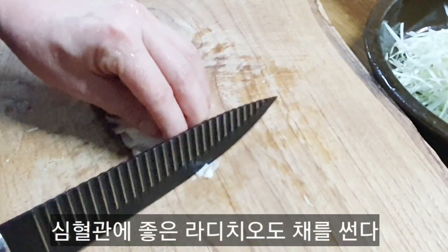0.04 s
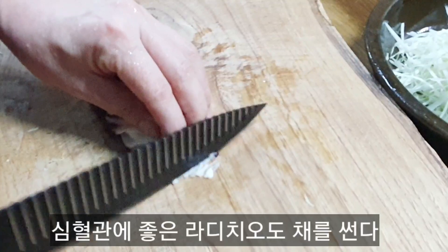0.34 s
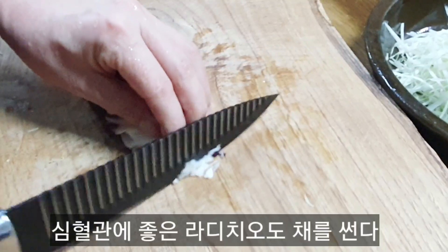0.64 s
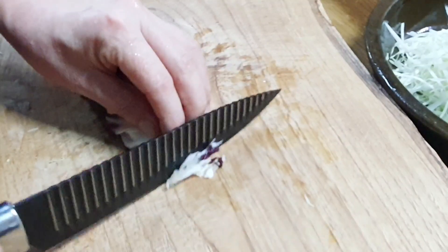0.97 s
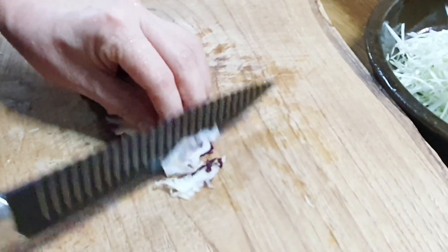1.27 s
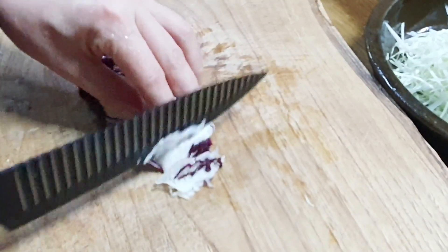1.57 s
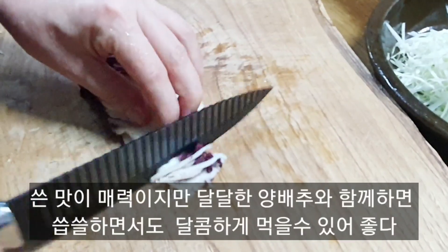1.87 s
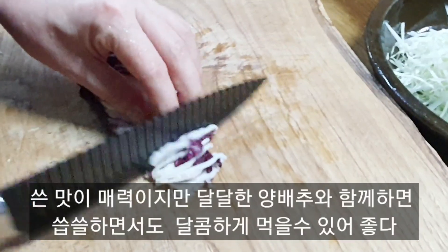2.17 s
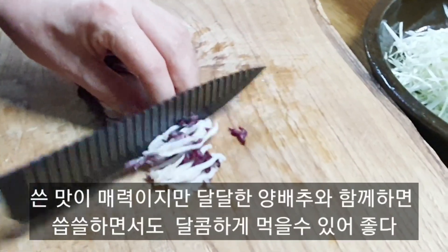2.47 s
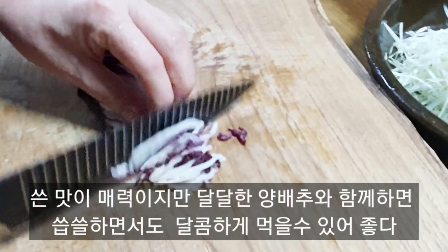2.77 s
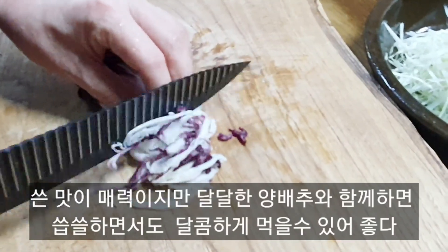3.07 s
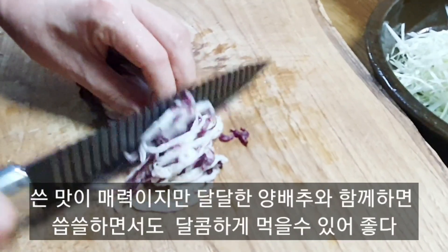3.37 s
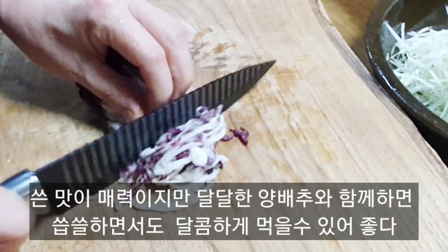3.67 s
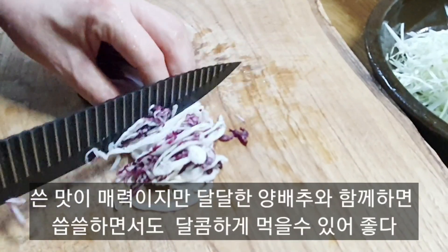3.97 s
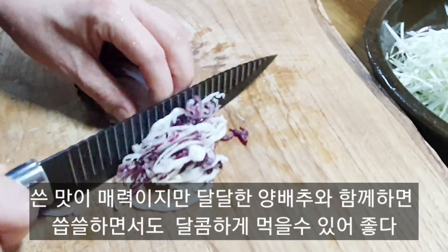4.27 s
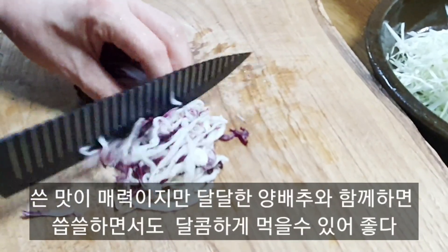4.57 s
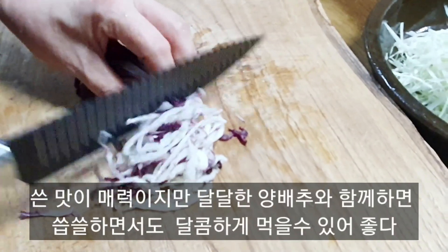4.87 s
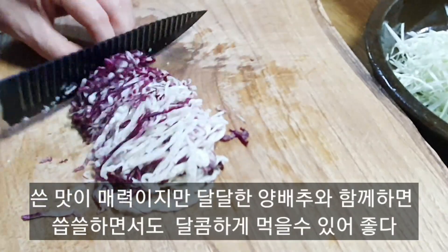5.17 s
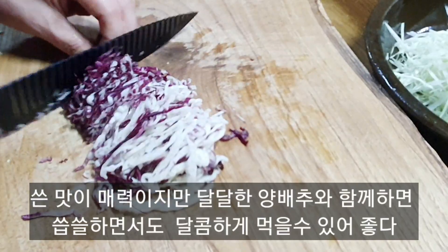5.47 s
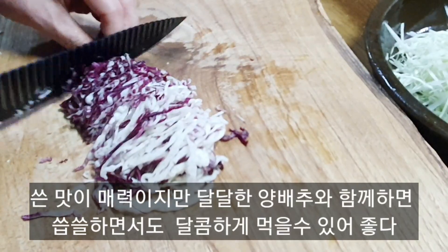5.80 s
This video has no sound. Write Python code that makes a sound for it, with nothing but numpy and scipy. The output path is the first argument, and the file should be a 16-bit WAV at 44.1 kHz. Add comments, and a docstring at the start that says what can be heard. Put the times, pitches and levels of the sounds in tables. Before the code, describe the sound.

A kitchen knife shreds crisp leaves on a thick wooden board, close by and slightly to the left, at five or six strokes a second. Each stroke is a short crunch ending in a woody knock, with the force varying and an occasional leaf snapping. The first five knocks sound lower in pitch, followed by a tiny dropout just before 1 second. The chopping continues, pausing briefly at about 1.6 seconds, then runs evenly and a little crunchier until another short pause near 4 seconds. More firm strokes follow, ending with a sharper leaf snap at about 5.1 seconds. From 5.4 to 6 seconds come four gentle cuts, with two dull bumps of the rocking board among them. A faint, steady rush and hum of a small kitchen lies underneath throughout.

```python
"""A chef's knife shreds a leafy vegetable on a thick wooden board, five or six strokes a second.
Each stroke fractures the leaves in a swelling crunch, then its impact excites the modes of the board.
The first five knocks sound lower in pitch, and a brief dropout follows them; the last four are gentle,
with two dull bumps of the rocking board between them. A small kitchen reverberates and hums faintly."""
import sys
import numpy as np
from scipy import signal
from scipy.fft import rfft, irfft, next_fast_len
from scipy.io import wavfile
from scipy.ndimage import uniform_filter1d

SR = 44100
rng = np.random.default_rng(int(sys.argv[2]) if len(sys.argv) > 2 else 0)


def put_to_file(sound):
    """Save the sound as 16-bit audio at rate SR, in the file named by the first command-line argument."""
    columns = np.atleast_2d(sound).T  # one column per channel
    safe = np.clip(columns, -1, 1)
    whole_steps = np.round(safe * 32767)
    wavfile.write(sys.argv[1], SR, whole_steps.astype(np.int16))


N = 266364

# Knife strokes. Each row: landing time in seconds, relative knock level in dB, chatter against the
# first contact in dB, time in the leaves in seconds, relative crunch level in dB.
STROKES = [(0.0816, -28, -11, 0.0069, -62), (0.275, -38.5, -5, 0.02, -70),
           (0.4586, -31.5, -20, 0.024, -71.5), (0.6532, -32.5, 1, .028, -64),
           (0.8564, -39, -14, 0.046, -64), (1.0238, -48.5, -20, 0.027, -59), (1.1609, -39, -18, 0.033, -60),
           (1.309, -33.5, -8, 0.026, -56.5), (1.4533, -31, -22, .042, -59.5),
           (1.8275, -35.5, -6, 0.041, -59.5), (1.9666, -24.5, -4.5, 0.019, -69),
           (2.1381, -48.5, 5, 0.049, -63), (2.294, -36.5, -7, 0.04, -58.5),
           (2.4484, -43.5, -20, 0.041, -58), (2.602, -38.5, 2.5, .042, -53.5),
           (2.753, -34.5, -13, 0.033, -54), (2.881, -28, 7, .021, -73), (3.0547, -42.5, 9, 0.042, -57.5),
           (3.2307, -39, 1, 0.044, -58.5), (3.4073, -32.5, -17, 0.042, -56),
           (3.5787, -27.5, 13.5, 0.033, -58), (3.7649, -33, -14, .04, -58), (4.1445, -32.5, -8, .044, -61),
           (4.3471, -30.5, -16, 0.048, -58.5), (4.534, -44, -9, 0.046, -58),
           (4.712, -28.5, -3.5, 0.038, -58.5), (4.8948, -31, -16, 0.039, -53.5),
           (5.079, -29.5, -8.5, 0.058, -61), (5.363, -49, 0.5, 0.018, -62), (5.542, -43.5, 1, 0.0058, -56),
           (5.7255, -49.5, -1, 0.011, -62.5), (5.91, -56, -2, 0.018, -68.5)]
# Modes of the struck board. Each row: frequency in Hz, nominal width in Hz, relative level in dB.
BOARD_MODES = [(90, 93, -13.5), (163, 69, -5.5), (314, 20, -19.5), (530, 146, -9), (628, 165, -1),
               (775, 53, 4.5), (851.4, 27, 4), (1262, 169, 2), (1420, 97, 0.5), (1545, 134, -3.5),
               (1753, 120, -11), (2227, 60, -19), (2390, 85, -13), (2660, 180, -20), (2964, 71, -20.5),
               (3280, 41, -23), (4210, 420, -24.5)]
# Cushioning of the blow by the leaves. Each row: frequency in Hz, gain in dB.
CUSHION = [(20, -18), (70, -6), (160, 1), (500, 2.5), (1600, 0.5), (1900, 0.5), (2400, -1.5), (3400, -3.5),
           (5000, -20), (9000, 7), (15000, -45)]
# Radiation of the board into the room. Each row: frequency in Hz, gain in dB.
RADIATION = [(30, -41), (120, -16), (300, -5.5), (480, -4), (720, 4.5), (870, -4), (1030, -2), (1250, 1),
             (1600, -8), (1950, -17.5), (2400, -19), (3300, -34), (5000, -42), (12000, -52.5)]
# Spectrum of the chattering edge. Each row: frequency in Hz, relative level in dB.
CHATTER = [(150, 2.5), (700, 4.5), (1300, 3.5), (1800, 3.5), (2500, 6.5), (4000, 3.5)]
# The knock at the right ear against the left. Each row: frequency in Hz, gain in dB.
KNOCK_RIGHT_DB = [(180, -6.5), (520, -3), (645, -46), (830, 2), (1276, -15.5), (1590, -1), (2380, -7.5),
                  (4000, -11)]
# Phase of the knock at the right ear. Each row: frequency in Hz, lag behind the left in radians.
KNOCK_RIGHT_LAG = [(345, 0), (520, -1.67), (645, 1), (790, 0.84), (880, 1.47), (1276, -1.54), (1590, 0.8),
                   (2210, 1.4), (2670, 0.5)]
# Single leaves snapping. Each row: start in seconds, relative level in dB.
SNAPS = [(0.0816, -60), (0.254, -54.5), (.631, -55), (1.011, -54), (1.68, -58), (2.2375, -58), (2.393, -64),
         (2.7046, -51.5), (5.074, -39), (5.738, -58)]
# The crunch carried by the air. Each row: frequency in Hz, gain in dB.
AIRBORNE = [(40, -20), (200, -14), (700, 2), (1400, 12), (2200, 6.5), (3500, 1.5), (5500, -2), (8000, 1.5),
            (11000, -3), (15000, -13)]
# The crunch carried by the board. Each row: frequency in Hz, gain in dB.
THROUGH_BOARD = [(40, -27), (160, 0), (450, 15.5), (750, 17), (1000, 15), (1400, 14.5), (2000, -10),
                 (2900, 0), (4500, -31), (12000, -14.5)]
# The crunch at the right ear against the left. Each row: frequency in Hz, gain in dB.
CRUNCH_RIGHT_DB = [(700, -38), (2000, -4.5), (4000, -12.5), (8000, -7.5), (13000, -18)]
# Dull bumps of the board. Each row: start in seconds, relative level in dB.
BUMPS = [(5.406, -41.5), (5.778, -39)]
# Modes of the board rocking on the counter. Each row: frequency in Hz, relative level in dB,
# 60 dB decay time in seconds.
ROCKING_MODES = [(159, -3.5, 0.048), (260.3, -11.5, 0.26), (333, -2, 0.05), (447, -0.5, 0.033),
                 (650, -12, 0.048)]
# Kitchen reverberation at pitch ratio 1. Each row: frequency in Hz, 60 dB decay time in seconds.
KITCHEN_T60 = [(150, 0.2), (600, 0.16), (1400, 0.15), (3000, .18), (8000, 0.13), (14000, 0.1)]
# The kitchen's steady rush. Each row: frequency in Hz, relative spectral density in dB.
RUSH_SPECTRUM = [(20, -20), (50, -9.5), (80, -6), (160, -3), (260, -1.5), (380, -3.5), (500, -6),
                 (800, -9.5), (1300, -10), (2000, -18.5), (4000, -20.5), (8000, -31.5), (12000, -39)]
# Likeness of the rush at the two ears. Each row: frequency in Hz, correlation.
RUSH_CORRELATION = [(60, 0.98), (290, 1), (640, 0.71), (1400, 0.26), (7000, 0.55)]
# Leftward lean of the rush. Each row: frequency in Hz, left over right in dB.
RUSH_LEAN = [(60, 7), (380, 6), (1300, 2), (8000, 2.5)]
# Treble response of the microphone. Each row: frequency in Hz, gain in dB.
MICROPHONE = [(10800, 1), (12500, -2.5), (14000, -14), (15300, -15)]

LOW_UNTIL_S, LOW_PITCH = 0.94, 0.746  # the opening knocks and background sound lower by this ratio
USUAL_KNOCK_DB, USUAL_CRUNCH_DB = -33, -59
BODY_DB, BODY_LOSS = -4, 0.37  # low modes at the usual knock; dB lost per dB of knock
BRIGHT_DB, BRIGHT_GROWTH = -1.5, 0.59  # high modes at the usual knock; dB gained per dB of knock
# A thicker bunch of leaves crunches louder, swells more steeply and shields the board.
SWELL_DB, SWELL_GROWTH = 10.5, 0.35  # rise over the usual cut; dB more per dB of crunch
CARRIED_DB, SHIELDING = -1.5, 0.3  # drive into the board; dB lost per dB of crunch
FOLLOW_THROUGH_S = 0.0049  # the last fibres part just after the edge lands


def knocks(size=12288):
    """Impact excites the board's modes; a harder blow is a shorter contact and favours the high ones."""
    out = np.zeros((2, N))
    for start, db, chatter_db, _, _ in STROKES:
        pitch = LOW_PITCH if start < LOW_UNTIL_S else 1
        harder = db - USUAL_KNOCK_DB
        hz = np.fft.rfftfreq(size, 1 / SR) / pitch
        low = np.clip((1200 - hz) / 300, 0, 1)
        high = np.clip((hz - 1300) / 280, 0, 1) + 0.51 * np.clip((hz - 1700) / 600, 0, 1)
        colour = amp(low * (BODY_DB - BODY_LOSS * harder) + high * (BRIGHT_DB + BRIGHT_GROWTH * harder))
        power = sum(amp(level + rng.normal(0, 0.25)) ** 2 / (1 + (2 * (hz - mode) / width) ** 2) ** 1.66
                    for mode, width, level in BOARD_MODES)
        left = minimum_phase(np.sqrt(power) * colour * amp(along(CUSHION, hz)))
        right = left * amp(along(KNOCK_RIGHT_DB, hz)) * np.exp(-1j * along(KNOCK_RIGHT_LAG, hz))
        room = kitchen_echo(pitch, near_db=-16, room_db=-14, near_t60=0.056)
        echo = rfft(room, size) * minimum_phase(colour * amp(along(RADIATION, hz)))
        force = rfft(edge_contacts(size, pitch, chatter_db))
        knock = irfft(force * (np.array([left, right]) + echo))
        add(out, start, amp(db + 45) * knock[:, :size // 2])
    return out


def edge_contacts(size, pitch, chatter_db, chatter_s=0.017, heel_s=0.003091, heel_db=5):
    """Contact force as impulses: tip, heel, then fading chatter. All times stretch by 1 / pitch."""
    t = np.arange(size) / SR * pitch
    taps = (rng.random(size) < 4000 / SR) * np.sign(rng.standard_normal(size))
    chatter = unit(filtered(taps, lambda hz: amp(along(CHATTER, hz / pitch))))
    fade = np.exp(-t / chatter_s) * np.sqrt(2 * pitch / (chatter_s * SR))  # energy 1, like the tip
    force = amp(chatter_db) * chatter * fade
    force[0] += 1
    force[round(heel_s / pitch * SR)] += amp(heel_db)
    return force / np.linalg.norm(force)


def leaf_crunch():
    """Fracture of layer after layer makes a crunch that swells until the blade meets the wood."""
    out, t = np.zeros((2, N)), np.arange(SR // 8) / SR
    for landing, _, _, cut_s, db in STROKES:
        length = cut_s + FOLLOW_THROUGH_S
        thicker = db - USUAL_CRUNCH_DB
        swell_db = SWELL_DB + SWELL_GROWTH * thicker
        board_db = CARRIED_DB - SHIELDING * thicker
        depth = np.minimum(t / length, 1)
        layers = np.interp(t, np.arange(40) / 300, np.clip(rng.standard_normal(40), -1.5, 1.5))
        gate = np.minimum(t / 0.00067, 1) * np.exp(-np.maximum(t - length + 0.0055, 0) / 0.0032)
        envelope = gate * amp(db + 5.5 + swell_db * (depth - 0.7476) + 2.6 * layers)
        force = envelope * crackle(len(t), per_second=3000, spread_db=1.5, hiss=0.41)
        # The nearer the edge is to the wood, the more the crunch drives the board.
        through_board = coloured(amp(board_db) * depth * force, THROUGH_BOARD)
        add(out, landing - cut_s, leaf_radiation(coloured(force, AIRBORNE) + through_board))
    return out


def leaf_snaps():
    """Sudden fracture of a single leaf gives a crackle that decays exponentially."""
    out, t = np.zeros((2, N)), np.arange(SR // 8) / SR
    for start, db in SNAPS:
        snap = amp(db) * np.exp(-t / 0.0059) * crackle(len(t), per_second=3500, spread_db=5.5, hiss=0.23)
        add(out, start, leaf_radiation(coloured(snap, AIRBORNE)))
    return out


def crackle(n, per_second, spread_db, hiss):
    """Shot noise: leaf cells burst at random, in clicks of uneven size over a wet hiss."""
    clicks = (rng.random(n) < per_second / SR) * rng.standard_normal(n)
    clicks *= amp(spread_db * np.minimum(rng.exponential(size=n), 3))
    return unit(unit(clicks) + hiss * rng.standard_normal(n))


def leaf_radiation(crunch):
    """A level difference between the ears places the leaves to the left; reflections follow."""
    direct = np.array([crunch, coloured(crunch, CRUNCH_RIGHT_DB)])
    room = kitchen_echo(0.94, near_db=-4.5, room_db=-7.5, near_t60=0.014)
    echo = signal.fftconvolve(crunch[None], room, axes=1)
    return echo + np.pad(direct, ((0, 0), (0, echo.shape[1] - len(crunch))))


def board_bumps():
    """Damped vibration: a soft push rocks the board and only low modes ring, louder on the left."""
    out, t = np.zeros((2, N)), np.arange(SR // 3) / SR
    ring = sum(amp(db - 60 * t / t60) * np.sin(2 * np.pi * hz * t) for hz, db, t60 in ROCKING_MODES)
    ring *= 1 - np.exp(-t / 0.005)
    for start, db in BUMPS:
        room = kitchen_echo(0.53, near_db=-12, room_db=-14, near_t60=0.043)[0]
        echo = signal.fftconvolve(ring, room)[:len(t)]
        add(out, start, amp(db + 5.5) * (ring + echo) * amp([[0], [-7]]))
    return out


def kitchen_echo(pitch, near_db, room_db, near_t60):
    """Early reflections off counter and hands, then a diffuse tail. Times stretch by 1 / pitch."""
    hz, frame_s, noise = signal.stft(rng.standard_normal((2, SR // 4)), SR, nperseg=256)
    decay = amp(-60 * frame_s * pitch / along(KITCHEN_T60, hz / pitch)[:, None])
    tail = signal.istft(noise * decay, SR, nperseg=256)[1]
    t = np.arange(tail.shape[1]) / SR * pitch
    near = rng.standard_normal(tail.shape) * amp(-60 * t / near_t60) * (t > 0.001)
    tail *= np.clip((t - 0.003) / 0.0055, 0, 1)
    return (amp(near_db) * unit(near) + amp(room_db) * unit(tail)) / np.sqrt(len(t))


def room_air(pitch, hum_hz=336.6, hum_half_width_hz=4.9):
    """Broadband noise, coherent in the bass, with a narrow peak for an appliance's fuzzy hum."""
    def colour(hz):
        hz = hz / pitch
        angle = np.arccos(np.clip(along(RUSH_CORRELATION, hz), -1, 1)) / 2
        hum = 1 + amp(7.5) / (1 + ((hz - hum_hz) / hum_half_width_hz) ** 2)
        return amp(along(RUSH_SPECTRUM, hz)) * hum * np.array([np.cos(angle), np.sin(angle)])
    mid, side = filtered(rng.standard_normal((2, N)), colour)
    ears = np.array([mid + side, mid - side])
    return unit(filtered(ears, lambda hz: amp(np.outer([0.5, -0.5], along(RUSH_LEAN, hz)))))


def background(level_db=-60, dip_db=-5, dip_s=5.19, dip_width_s=0.071):
    """The noise floor of rush and hum is lower in pitch at first; later its level dips briefly."""
    t = np.arange(N) / SR
    dip = dip_db * np.exp(-((t - dip_s) / dip_width_s) ** 2)
    return amp(level_db + dip) * np.where(t < LOW_UNTIL_S, room_air(LOW_PITCH), room_air(1))


def amp(db):
    """Decibels to amplitude ratio."""
    return 10 ** (np.asarray(db) / 20)


def unit(x):
    """Normalisation to rms 1."""
    return x / np.sqrt(np.mean(x ** 2) + 1e-20)


def along(points, hz):
    """Interpolation of (Hz, value) points on a logarithmic frequency axis."""
    frequencies, values = np.transpose(points)
    return np.interp(np.log(hz + 1), np.log(frequencies + 1), values)


def filtered(x, response):
    """Linear filtering: the spectrum of x times a frequency response."""
    n = x.shape[-1]
    padded = next_fast_len(n + 4096)
    return irfft(rfft(x, padded) * response(np.fft.rfftfreq(padded, 1 / SR)), padded)[..., :n]


def coloured(force, spectrum):
    """Source and filter: a force heard through a (Hz, dB) spectrum."""
    return filtered(force, lambda hz: amp(along(spectrum, hz)))


def minimum_phase(gain):
    """Minimum phase gives the spectrum of the promptest causal ring with this gain."""
    cepstrum = irfft(np.log(np.maximum(gain, 1e-6)))
    half = len(cepstrum) // 2
    return np.exp(rfft(cepstrum * np.r_[1, np.full(half - 1, 2), 1, np.zeros(half - 1)]))


def add(track, start, sound):
    """Superposition of a stereo sound on the track, from a start in seconds."""
    i = max(round(start * SR), 0)
    track[:, i:i + sound.shape[1]] += sound[:, :max(N - i, 0)]


def scene():
    """Knife, leaves, board and humming kitchen add by superposition."""
    return knocks() + leaf_crunch() + leaf_snaps() + board_bumps() + background()


def record(dry):
    """The microphone acts as a low-pass filter; the sound drops out briefly after the opening strokes."""
    t = np.arange(N) / SR
    dropout = (t > 0.953) & (t < 0.978)
    gate = uniform_filter1d(1.0 - dropout, size=64)
    return filtered(dry * gate, lambda hz: amp(along(MICROPHONE, hz)) * (hz < 15300))


dry = scene()
out = record(dry)
put_to_file(out)
```